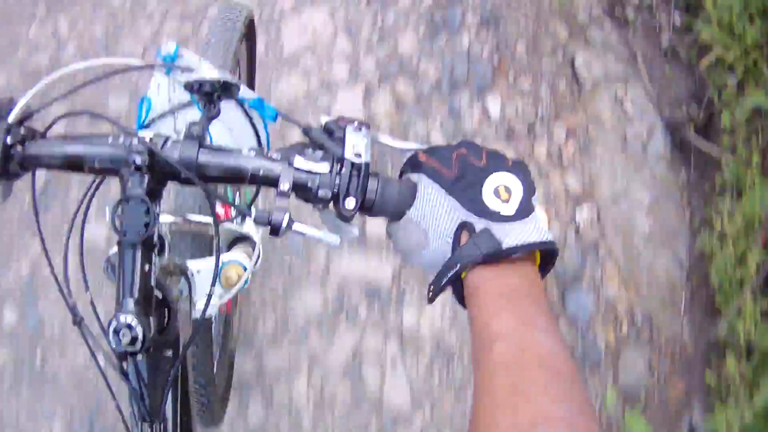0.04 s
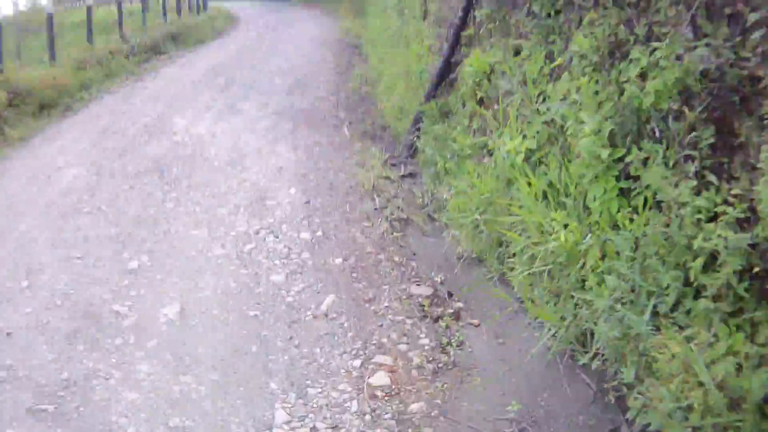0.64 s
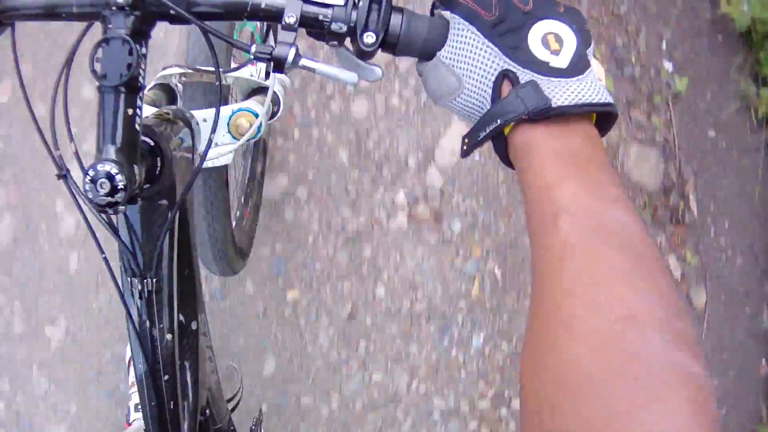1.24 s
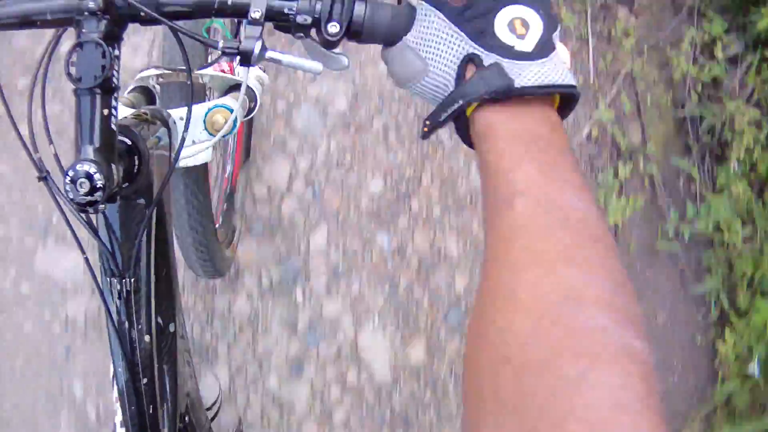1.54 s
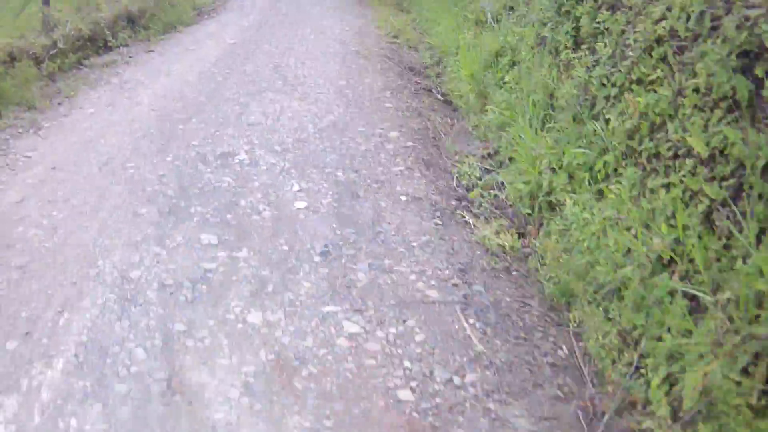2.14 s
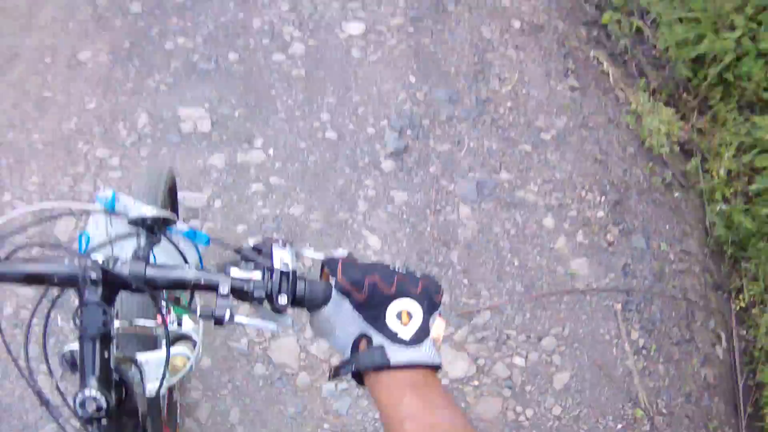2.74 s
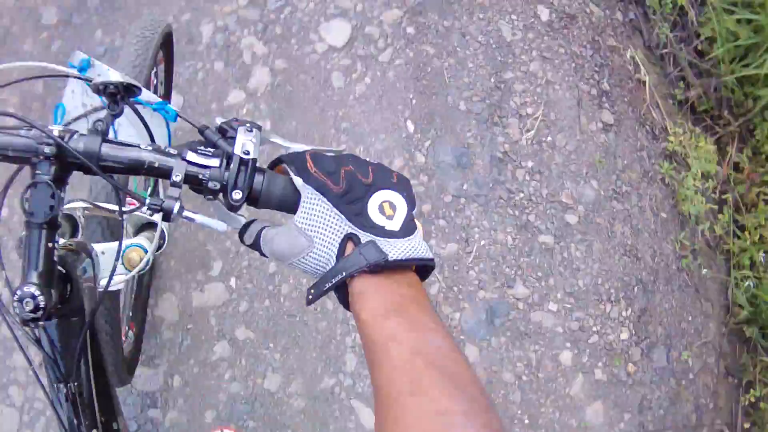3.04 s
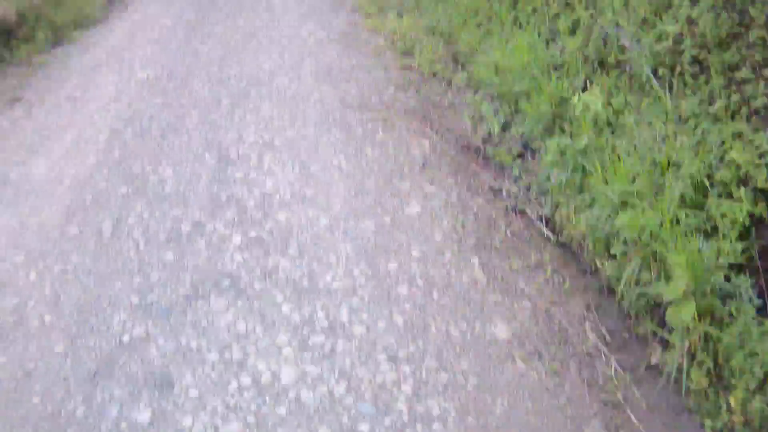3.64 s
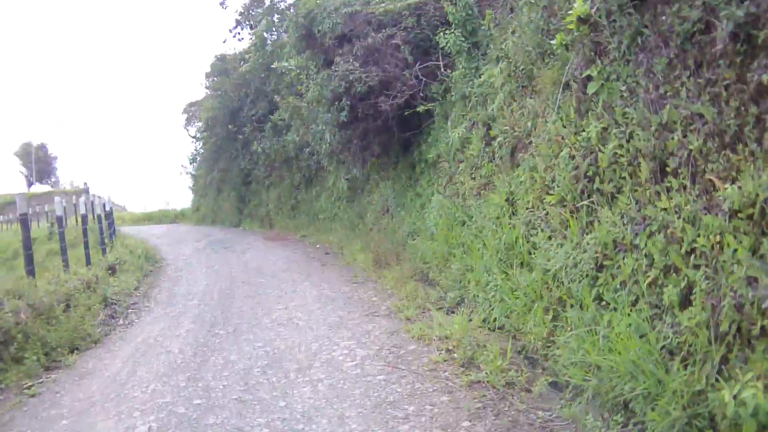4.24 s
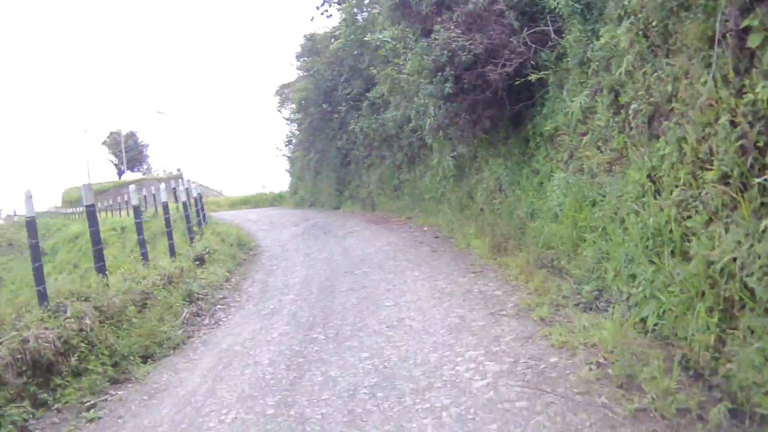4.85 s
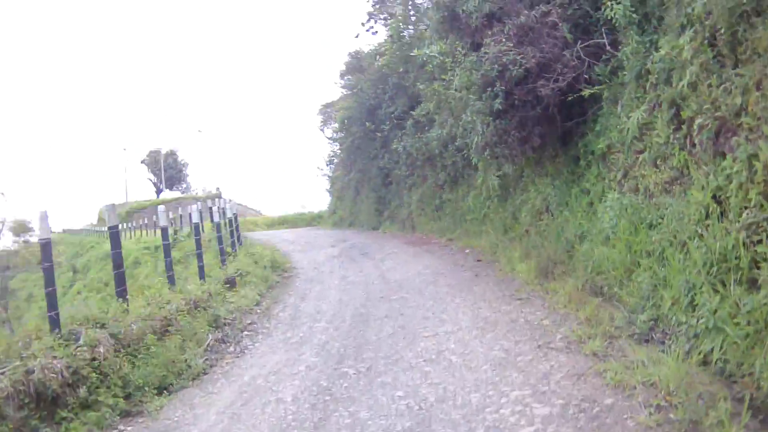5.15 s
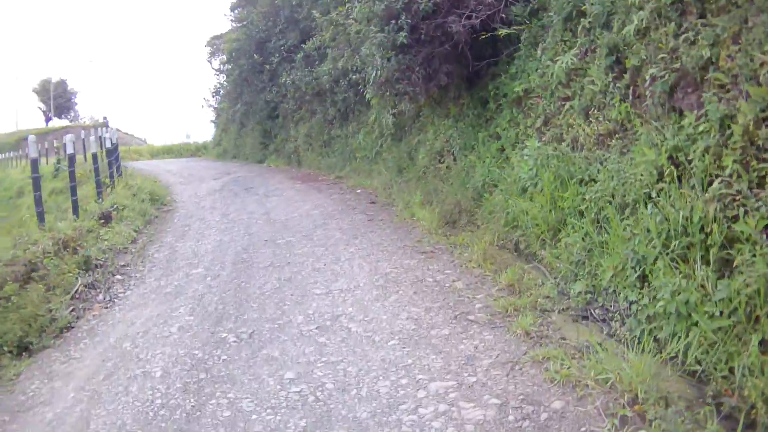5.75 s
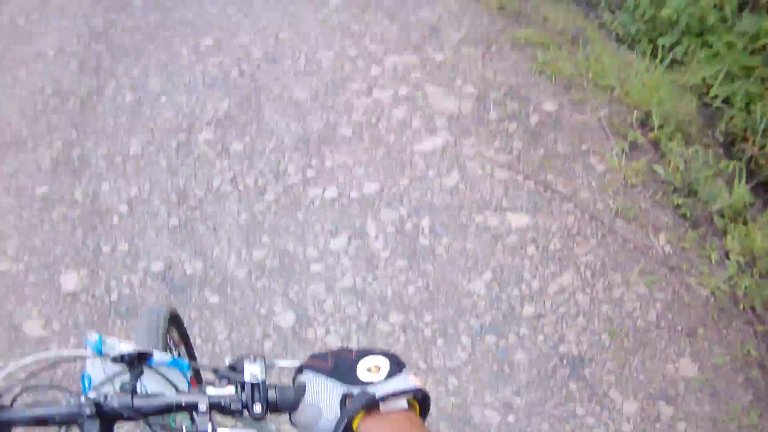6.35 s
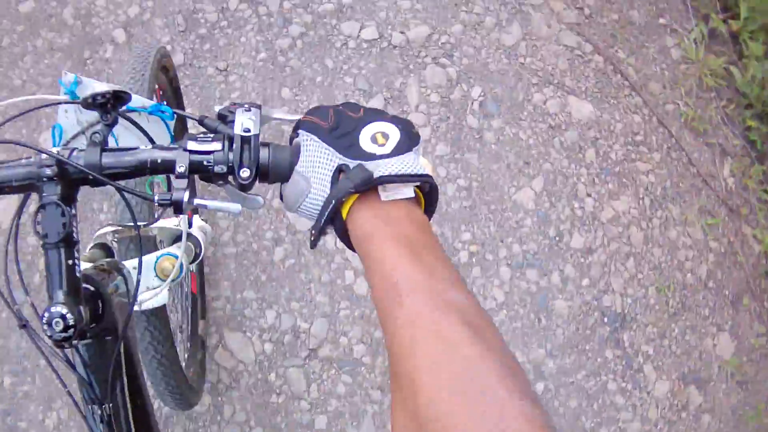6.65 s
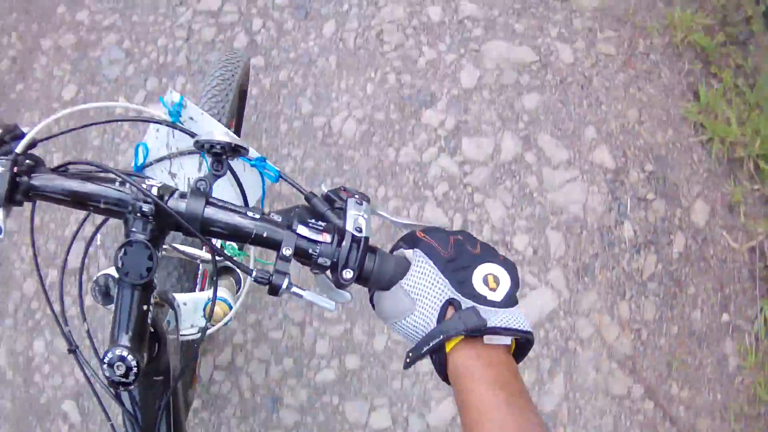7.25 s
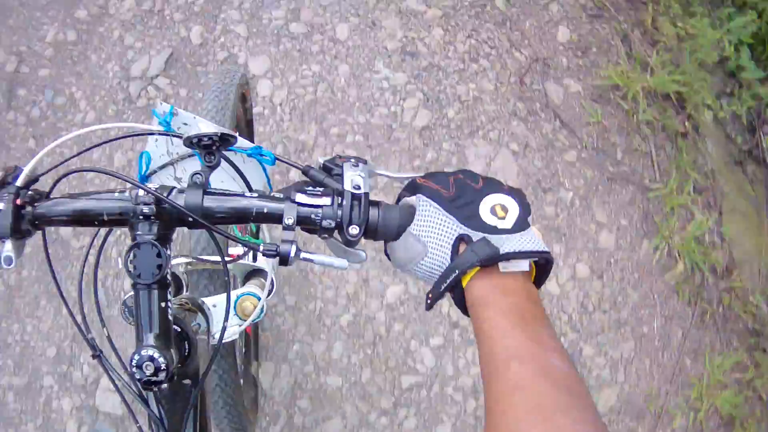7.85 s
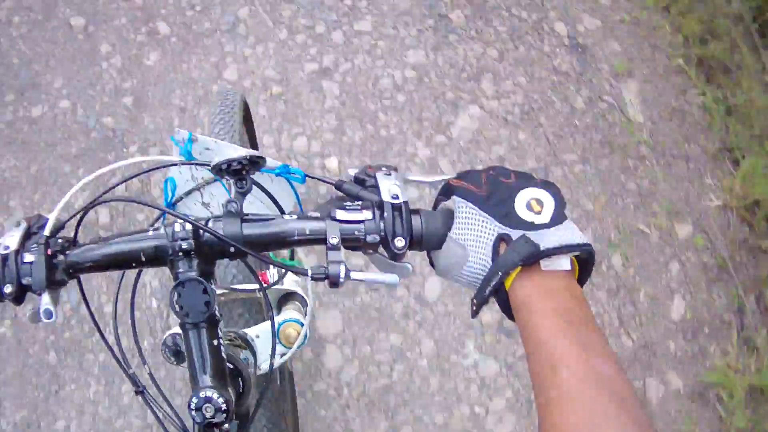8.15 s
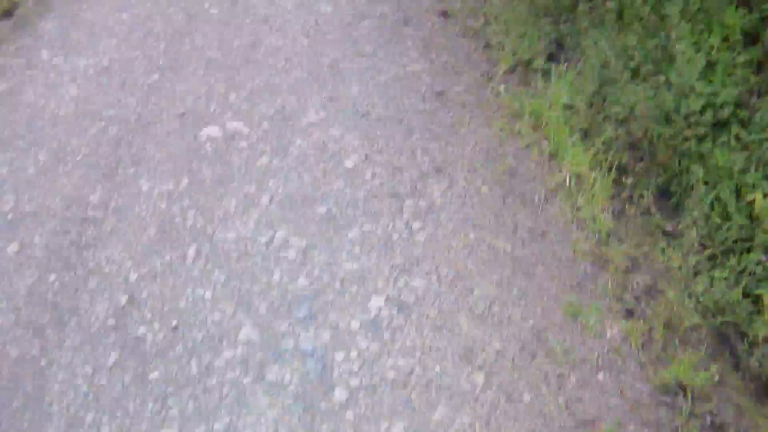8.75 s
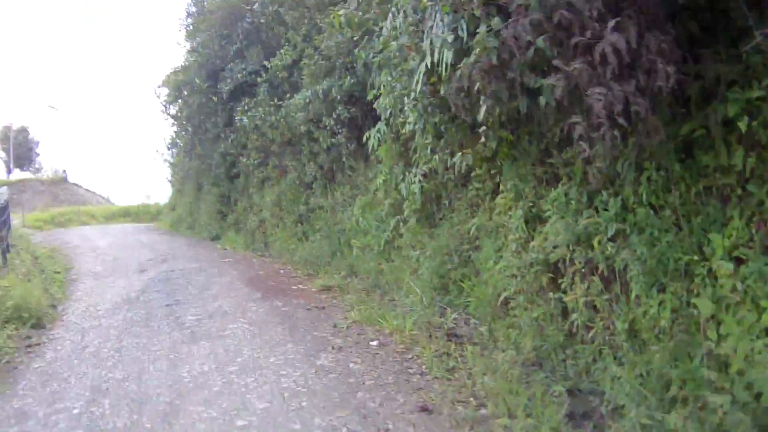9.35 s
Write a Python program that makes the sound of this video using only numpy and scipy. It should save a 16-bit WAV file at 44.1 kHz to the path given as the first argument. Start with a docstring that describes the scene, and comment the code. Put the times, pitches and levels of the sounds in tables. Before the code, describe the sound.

A bicycle slows on a stony road as wind rumble fades, pebbles pop and the chain clacks and rattles through gear changes.

```python
"""Loose gravel road: a mountain bike rolls along, heard from a small camera worn by the rider.
Wind buffets the microphone and dies away as the bike slows. The tyres drum, hum and crunch;
stones pop from under the tread; the brake disc brushes its pads; bright ticks sound now and then.
Midway the gears are changed: lever and chain clack, rattle on and ring the frame,
overloading the camera."""
import sys
import numpy as np
from scipy import signal
from scipy.fft import rfft, irfft, next_fast_len
from scipy.io import wavfile
from scipy.ndimage import uniform_filter1d

SR = 44100
rng = np.random.default_rng(int(sys.argv[2]) if len(sys.argv) > 2 else 0)


def transcribe(u):
    """Save the signal u as a 16-bit wav file named by the first command-line argument.

    u: samples, shape (n,) or (channels, n), limited to [-1, 1]; the rate is SR.
    q: integer samples, one column per channel.
    """
    v = np.clip(np.atleast_2d(u).T, -1, 1)
    q = np.round(v * 32767).astype(np.int16)
    wavfile.write(sys.argv[1], SR, q)


N = 418950
TIME = np.arange(N) / SR


def undb(db):
    """dB to gain."""
    return 10 ** (np.asarray(db) / 20)


def unit(x, count=N):
    """Scale to rms 1 over the first count samples."""
    return x / np.sqrt(np.mean(x[:count] ** 2))


def colour(x, spectrum):
    """Minimum-phase filter; spectrum rows: f/Hz, gain/dB."""
    size = next_fast_len(len(x) + 8192, real=True)
    hz, db = np.transpose(spectrum)
    log_gain = np.interp(np.log(np.fft.rfftfreq(size, 1 / SR) + 1), np.log(hz), np.log(undb(db)))
    cepstrum = irfft(log_gain, size)
    cepstrum[1:size // 2] *= 2
    cepstrum[size // 2 + 1:] = 0
    return irfft(rfft(x, size) * np.exp(rfft(cepstrum)), size)[:len(x)]


def resonate(x, hz, width_hz):
    """One resonance, gain 1 at centre."""
    return signal.lfilter(*signal.iirpeak(hz, hz / width_hz, fs=SR), x)


def walk(rate_hz):
    """Smoothed random steps, rms 1."""
    hold = max(int(SR / rate_hz), 1)
    steps = np.repeat(rng.standard_normal(N // hold + 1), hold)
    return unit(uniform_filter1d(uniform_filter1d(steps, hold), hold)[:N])


def fade(t, t60_s):
    """Free decay, -60 dB at t60_s."""
    return np.exp(-np.log(1000) * t / max(t60_s, 1 / SR))


def impacts(count, per_s, spread_db):
    """Random tiny impacts: many weak, few strong."""
    strength = np.minimum(rng.exponential(size=count), 4)
    return (rng.random(count) < per_s / SR) * rng.choice([-1, 1], count) * undb(spread_db * strength)


def scrape(t, t60_s, attack_s):
    """Noise burst: fast build-up, free decay."""
    return rng.choice([-1, 1], len(t)) * fade(t, t60_s) * (1 - np.exp(-t / attack_s))


def shaken_modes(drive, modes, width_hz):
    """Decaying resonances under a common drive."""
    t = TIME[:len(drive)]
    return sum(undb(db) * unit(resonate(drive, hz, width_hz)) * fade(t, t60_s) for hz, db, t60_s in modes)


def add(track, start_s, sound):
    """Mix sound into track at start_s."""
    start = max(int(start_s * SR), 0)
    track[start:start + len(sound)] += sound[:N - start]


def hiss_and_whine():
    """Steady hiss, independent per channel; a faint, very high whine in opposite phase between them."""
    hiss_spectrum = [(20, 26.5), (200, 14.5), (450, 2.5), (1000, -0.5), (3000, 0), (15000, 3)]  # f/Hz, gain/dB
    whine_bands = [(10940, 250, -66), (14730, 350, -62)]  # f/Hz, width/Hz, level/dB
    hiss = np.array([unit(colour(rng.standard_normal(N), hiss_spectrum)) for _ in range(2)])
    whine = 0
    for hz, width_hz, db in whine_bands:
        band = resonate(rng.standard_normal(N), hz, width_hz)
        whine += undb(db) * unit(resonate(band, hz, width_hz))
    return undb(-52.5) * hiss + whine * np.array([[.6], [-1.3]])


def wind():
    """Eddies tumble over the microphone."""
    eddy_spectrum = [(10, 1.5), (45, 0.5), (140, -5), (230, -11), (450, -16), (900, -33), (2500, -88)]  # f/Hz, gain/dB
    airflow = [(0.0, -27), (0.76, -22), (0.95, -29.5), (1.82, -34), (2.17, -34), (2.7, -35.5), (2.88, -42),
               (3.36, -44.5), (5.0, -47), (5.53, -46.5), (6.82, -50), (7.28, -49), (9.5, -46)]  # wind strength: t/s, level/dB
    eddies = unit(colour(rng.standard_normal(N), eddy_spectrum) * undb(1.64 * walk(rate_hz=16)))
    return undb(np.interp(TIME, *np.transpose(airflow)) + 3.0) * eddies


def tyre_drum():
    """Tread knobs and stones drum on the tyre casing."""
    casing_modes = [(394, 61, 0.5), (480, 72, 4.5), (597, 37, -6.5)]  # f/Hz, width/Hz, gain/dB
    drumming = unit(impacts(N, per_s=1500, spread_db=4.5)) * undb(3.0 * walk(rate_hz=14))
    return unit(sum(undb(db) * resonate(drumming, hz, width_hz) for hz, width_hz, db in casing_modes))


def tyre_hum():
    """The rough road rings the air in the tyres at one pitch, swelling with the bumps."""
    cavity_hz = 315
    ringing = resonate(rng.standard_normal(N), cavity_hz, width_hz=20)
    ringing = resonate(ringing, cavity_hz, width_hz=60)
    return unit(ringing * undb(2.1 * walk(rate_hz=11)))


def gravel():
    """Grit crackles under the tread; pebbles give way in brief crunches, some click."""
    crunch_spectrum = [(150, -5.5), (500, -5), (900, -5), (1300, 0), (1850, 1), (2150, -0.5), (2370, 2.5),
                       (2700, -2), (3400, -2), (4500, -10.5), (6000, -19), (8000, -30.5), (15000, -52)]  # f/Hz, gain/dB
    grit = unit(impacts(N, per_s=8000, spread_db=1.0))
    slips = np.abs(impacts(N, per_s=47, spread_db=1.5))
    crunches = unit(signal.fftconvolve(slips, fade(TIME[:SR // 5], t60_s=0.048))[:N])
    pebbles = sum(resonate(impacts(N, per_s=40, spread_db=1.5), hz, width_hz=hz / 8)
                  for hz in np.geomspace(1400, 3800, 6))
    contact = (grit + undb(-9) * unit(pebbles)) * (1 + 0.58 * crunches)
    return unit(colour(contact, crunch_spectrum) * undb(1.3 * walk(rate_hz=25)))


def brake_disc():
    """The disc brushes its pads, a wheel turn apart: a faint steel shimmer."""
    rubs = [(1.06, -39), (1.58, -38)]  # t/s, level/dB
    disc_modes = [(3950, 6), (4700, -13), (5550, -8)]  # f/Hz, gain/dB
    shimmer = sum(undb(db) * resonate(rng.standard_normal(N), hz, width_hz=54) for hz, db in disc_modes)
    return unit(shimmer) * sum(undb(db) * np.exp(-((TIME - s) / 0.02) ** 2) for s, db in rubs)


def snaps(events, spectrum, t60_s, width_hz, broad_db, scatter_db):
    """Millisecond bursts, each ringing at its own pitch, with a gritty tail."""
    track, t = np.zeros(N), TIME[:SR // 10]
    for start_s, db, hz in events:
        burst = scrape(t, t60_s, attack_s=0.0005)
        scatter = unit(impacts(len(t), per_s=3000, spread_db=3.0)) * fade(t, t60_s=0.1)
        burst += undb(scatter_db) * scatter
        snap = colour(resonate(burst, hz, width_hz) + undb(broad_db) * burst, spectrum)
        add(track, start_s, undb(db) * unit(snap, count=150))
    return track


def stone_pops(crunch_db):
    """Stones pop from under the tread: large ones at set times; small ones at random, crunch-scaled."""
    large_stones = [(0.0607, -11.5, 2280), (0.195, -12.5, 2280), (0.5425, -12, 2460), (0.8266, -11, 2190),
                    (0.8719, -16, 1830), (0.9535, -13.5, 1510), (1.381, -17, 3010), (1.6666, -11, 2090),
                    (1.8342, -14.5, 2300), (1.844, -19.5, 2190), (1.993, -18.5, 2820), (2.257, -17, 2840),
                    (2.2707, -19.5, 2160), (2.4643, -19.5, 3070), (2.5375, -18, 3060), (2.752, -16, 1650),
                    (2.814, -16.5, 1420), (3.3076, -19, 2330), (3.497, -14.5, 2490), (3.7446, -12.5, 3090),
                    (3.9975, -18.5, 1960), (5.9977, -25.5, 2470), (6.1302, -18, 3200), (6.3505, -23, 2890),
                    (6.371, -21, 3130), (6.8568, -26, 3460), (6.98, -19.5, 1820), (7.0634, -18.5, 2050),
                    (7.2281, -15.5, 3200), (7.2993, -21.5, 1980), (7.3805, -19, 2420),
                    (7.8725, -15.5, 1800), (7.9591, -19.5, 3100), (8.0494, -21, 3140),
                    (8.7974, -20.5, 3270), (8.812, -13.5, 2480)]  # t/s, level/dB, f/Hz
    pop_spectrum = [(200, -1.5), (900, 2), (1600, 10.5), (3700, 8), (4800, -8.5), (6800, -17.5),
                    (8500, -47), (15000, -36)]  # f/Hz, gain/dB
    small_per_s, small_hz, spread_octaves = 1.8, 2460, 0.38
    draws = rng.standard_normal((int(small_per_s * N / SR), 2))
    starts = rng.integers(0, N, len(draws))
    small_stones = [(TIME[i], crunch_db[i] + 16.5 + 1.5 * size, small_hz * 2 ** (spread_octaves * pitch))
                    for i, (size, pitch) in zip(starts, draws)]
    stones = list(large_stones) + small_stones
    return snaps(stones, pop_spectrum, t60_s=0.017, width_hz=290, broad_db=-7.5, scatter_db=-13.5)


def bright_ticks():
    """Bright, sharp ticks; some come just before a gear clack."""
    events = [(0.8115, -7.5, 3520), (0.939, -10, 4600), (2.5865, -6.5, 3160), (2.6526, -5, 3340),
              (2.6611, -8, 3100), (2.7335, -6, 3530), (2.738, -2, 3570), (3.691, -6, 3300),
              (3.9389, -6, 3720), (4.2055, -19.5, 3450), (5.2345, -13.5, 3270), (5.3503, -10.5, 3100),
              (5.4612, -22, 3700)]  # t/s, level/dB, f/Hz
    tick_spectrum = [(200, 4), (1000, -6), (2400, 2.5), (4600, 0), (7200, -4.5), (8500, -18), (15000, -21)]  # f/Hz, gain/dB
    return snaps(events, tick_spectrum, t60_s=0.014, width_hz=1200, broad_db=-10.5, scatter_db=-20.5)


def gear_clacks():
    """Steel strikes steel: a crack, a dull thud; the chain rattles on, shaking frame and sprockets."""
    strikes = [(0.314, -25, 2330, -7), (2.7416, -1.5, 1560, -38), (3.0934, -21.5, 2060, -7.5),
               (3.2238, -14, 2230, -19), (3.3358, -14, 2400, -9), (3.4463, -13, 1940, -20.5),
               (4.13, -14, 2980, -14), (4.2502, -15, 2400, -16), (4.3875, -10, 3080, -11.5),
               (4.5312, -21, 2010, -14.5), (5.3556, 1, 3210, -32), (5.471, -11.5, 3680, -22),
               (5.6984, 1, 2530, -16), (5.828, -37.5, 1790, 1.5), (6.1648, -24.5, 2860, -14.5),
               (6.927, -28, 1650, -13)]  # lever, chain, frame: t/s, level/dB, f/Hz, frame blow/dB re level
    crack_spectrum = [(150, -36), (900, -13), (1400, -6), (2400, 1), (3500, 4.5), (4800, -4.5), (7000, -22),
                      (9000, -33.5), (15000, -42)]  # f/Hz, gain/dB
    rattle_spectrum = [(100, -9.5), (430, 9), (900, -3.5), (1350, 2.5), (1800, 2.5), (2500, 2.5),
                       (3500, -10), (5000, -12.5), (8000, -29), (15000, -68)]  # f/Hz, gain/dB
    thud_modes = [(412, 3, 0.017), (550, -6.5, 0.024), (1250, 1, 0.019)]  # frame, short: f/Hz, level/dB, t60/s
    ring_modes = [(167, -6.5, 0.25), (258, -10, 0.39), (404, -5, 0.37), (468, -0.5, 0.37), (632, -9, 0.26),
                  (723, -13, 0.41), (1200, -14.5, 0.42), (1350, -7.5, 0.27), (2320, 1.5, 0.094),
                  (3090, -2.5, 0.11)]  # frame, long: f/Hz, level/dB, t60/s
    sprocket_modes = [(2020, -3, 0.13), (2330, -2, 0.32), (2610, -2.5, 0.26), (2800, -9, 0.75),
                      (3380, -18, 0.14), (3700, 2, 0.19)]  # f/Hz, level/dB, t60/s
    slack_db = -7  # rattle grows with the strike until the chain's slack is used up
    track, t = np.zeros(N), TIME[:SR // 3]
    for start_s, db, hz, blow_db in strikes:
        contact = scrape(t, t60_s=0.026, attack_s=0.00085)
        crack = resonate(contact, hz, width_hz=230) + undb(-9.0) * contact
        crack = unit(colour(crack, crack_spectrum), count=300)
        thud = sum(undb(mode_db) * np.sin(2 * np.pi * mode_hz * t) * fade(t, t60_s)
                   for mode_hz, mode_db, t60_s in thud_modes)
        thud = resonate(thud, hz=426, width_hz=450)  # the frame radiates little deep bass
        links = impacts(len(t), per_s=1500, spread_db=4.5)
        rattle = unit(colour(links, rattle_spectrum)) * fade(t, t60_s=0.18)
        shaking = colour(impacts(len(t), per_s=700, spread_db=0.5), rattle_spectrum)
        ring = shaken_modes(shaking, ring_modes, width_hz=22)
        jingle = shaken_modes(shaking, sprocket_modes, width_hz=90)
        chain = undb(-13) * (rattle + undb(-11.0) * jingle) / np.hypot(1, undb(db - slack_db))
        frame = undb(blow_db) * (undb(13) * thud + undb(-5.5) * ring)
        add(track, start_s, undb(db) * (undb(-8) * crack + chain + frame))
    return track


def scene():
    """Rolling drives drum, hum and crunch; bike and wind are equal in both channels."""
    roll = [(0.0, -32.5), (0.47, -40), (0.76, -38.5), (1.16, -41.5), (1.74, -41.5), (2.27, -45.5),
            (3.36, -46), (3.75, -45.5), (4.21, -51.5), (4.34, -53), (4.66, -48), (5.84, -50.5),
            (6.69, -54.5), (9.5, -46.5)]  # rolling strength, falling as the bike slows: t/s, level/dB
    patches = [(0.91, 0.26, 3.5), (1.655, 0.091, 0), (3.62, 0.24, 1.5), (4.682, .12, -3.5),
               (5.95, 0.23, -3.5), (6.687, .1, 5.5), (7.186, 0.15, 6), (8.013, 0.087, 4.5),
               (9.45, .2, -2.5)]  # loose (+) or packed (-) road: centre/s, half length/s, gain/dB
    roll_db = np.interp(TIME, *np.transpose(roll)) + 46  # 0 dB at a middling roll
    loose_db = sum(db * np.exp(-((TIME - s) / half_s) ** 2) for s, half_s, db in patches)
    crunch_db = -40.5 + 0.73 * roll_db + loose_db
    drum = undb(-44 + 0.75 * roll_db) * tyre_drum()
    hum = undb(-46 + 1.43 * roll_db) * tyre_hum()
    crunch = undb(crunch_db) * gravel()
    air = wind()
    ticks = undb(-11.0) * bright_ticks()
    metal = gear_clacks() + brake_disc()
    noise_floor = hiss_and_whine()
    stones = undb(-10.0) * stone_pops(crunch_db)
    return noise_floor + air + drum + hum + crunch + stones + ticks + metal


def record(dry):
    """Off-centre converter: loud troughs clip on the left, crests on the right; the top is cut."""
    offset = np.array([[-.707], [.707]])  # DC, re full scale
    top_hz = 15100
    clipped = np.clip(dry + offset, -1, 1) - offset
    lowpass = signal.ellip(10, .2, 70, top_hz, fs=SR, output="sos")
    return offset + signal.sosfilt(lowpass, clipped)


dry = scene()
out = record(dry)
transcribe(out)
```